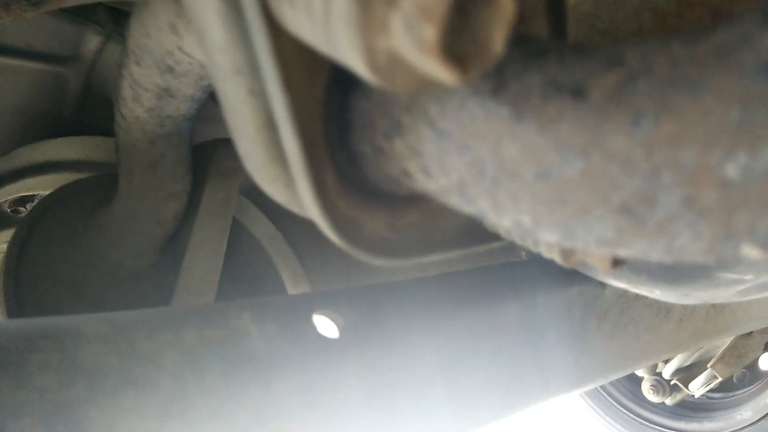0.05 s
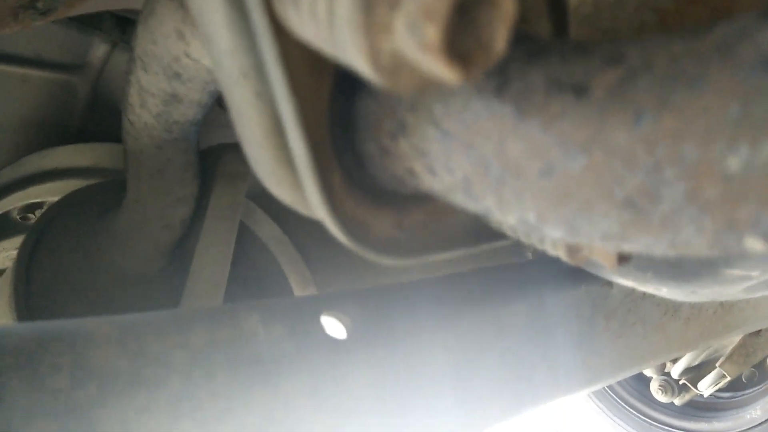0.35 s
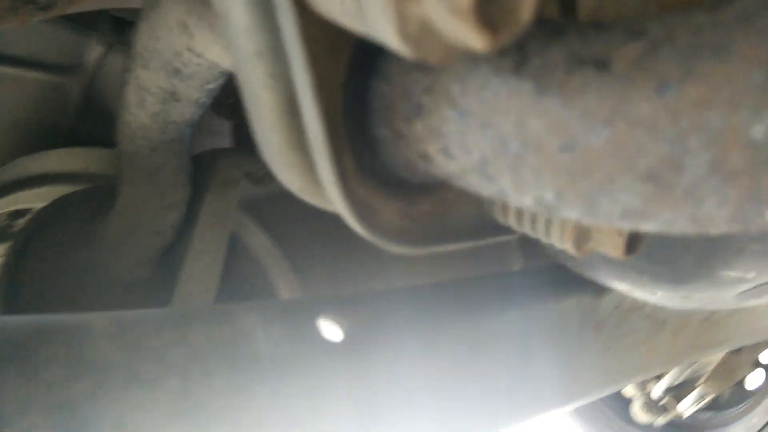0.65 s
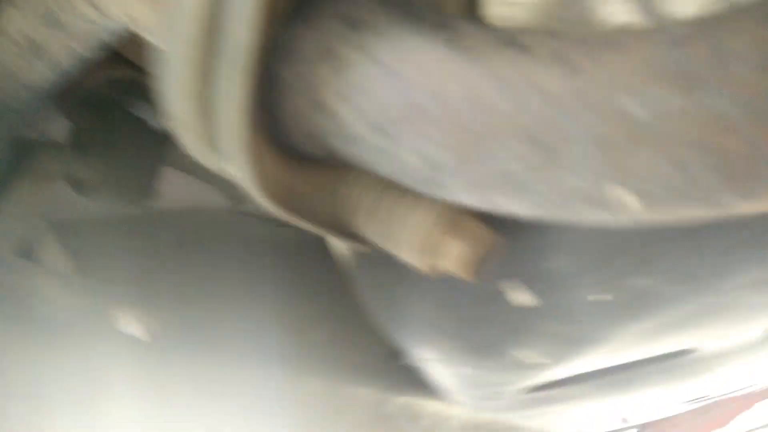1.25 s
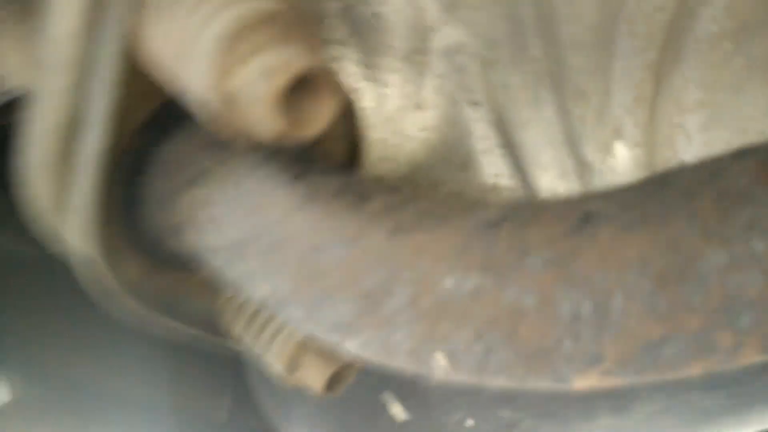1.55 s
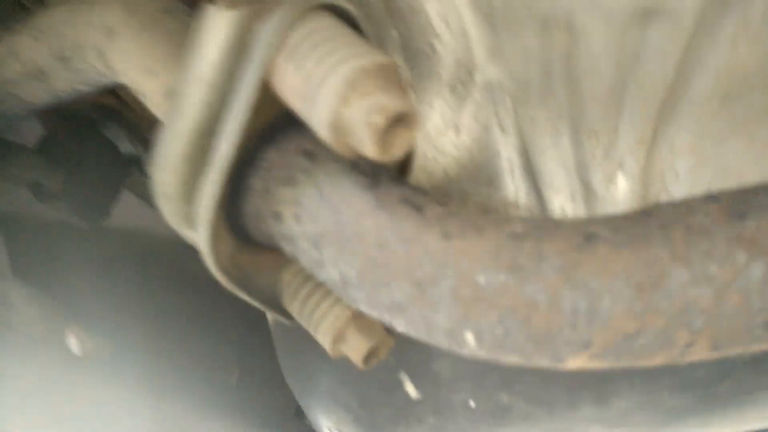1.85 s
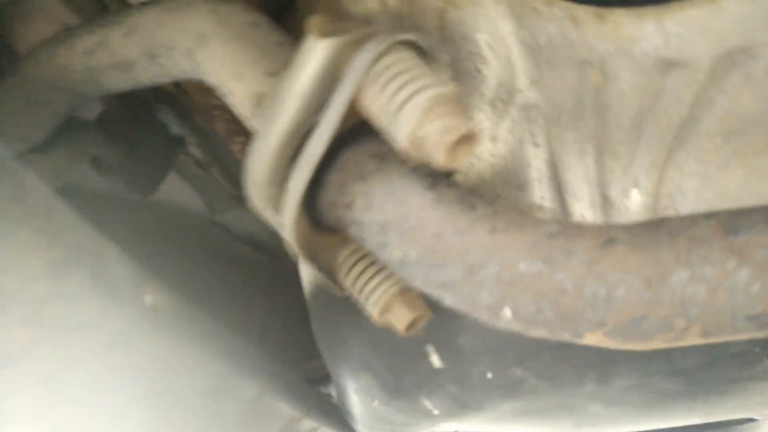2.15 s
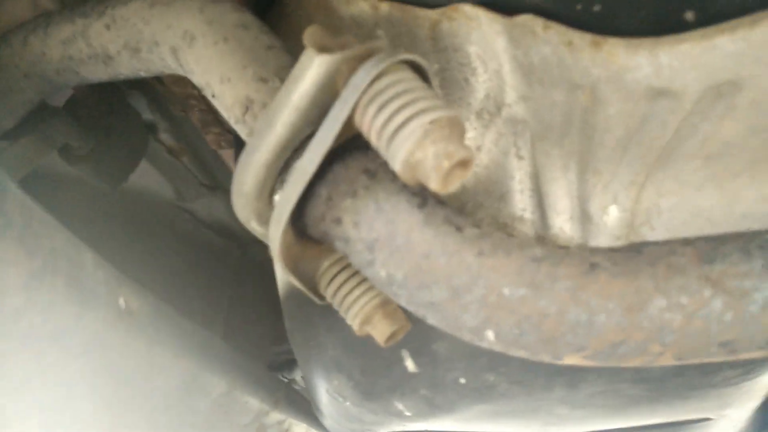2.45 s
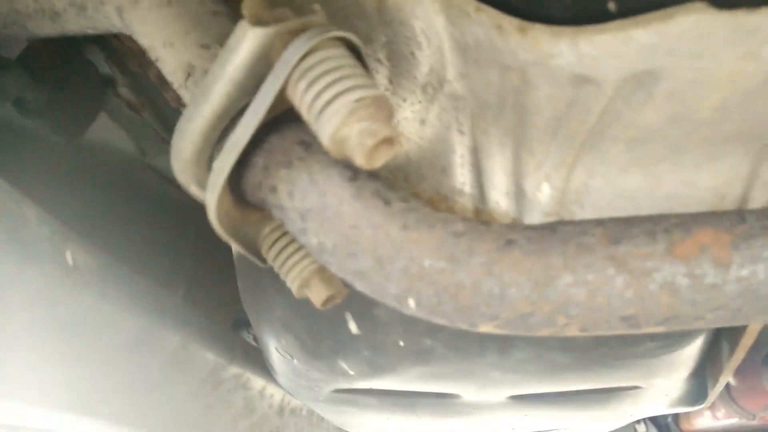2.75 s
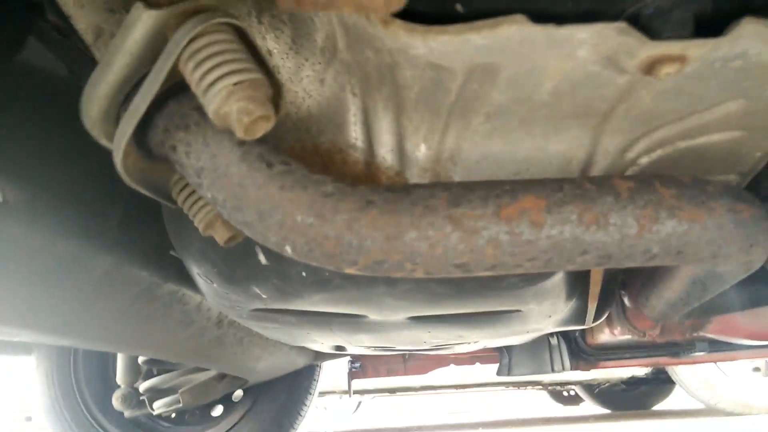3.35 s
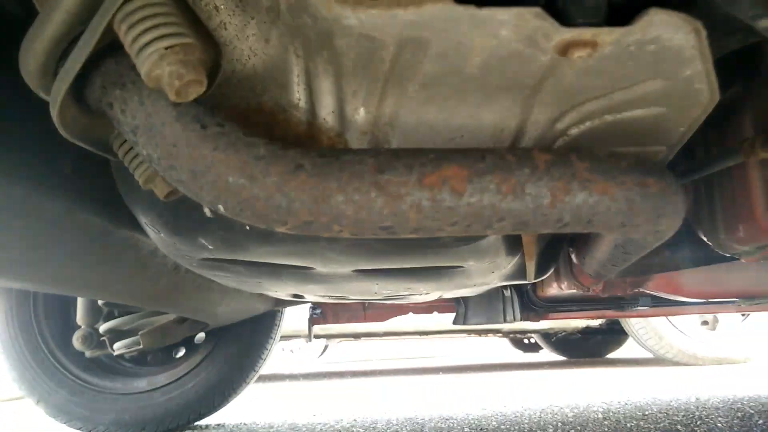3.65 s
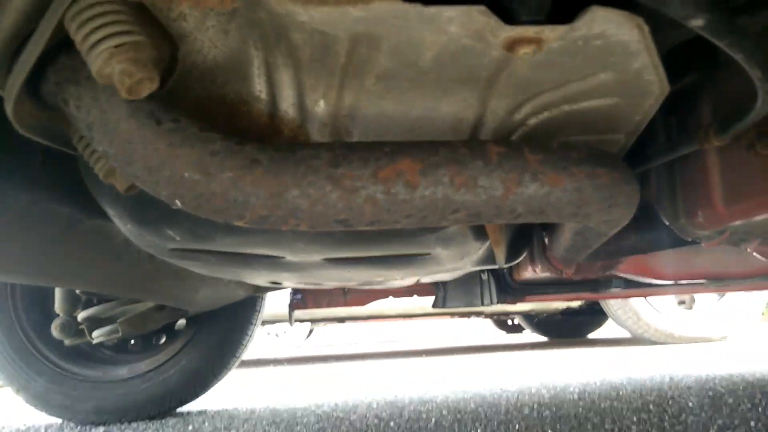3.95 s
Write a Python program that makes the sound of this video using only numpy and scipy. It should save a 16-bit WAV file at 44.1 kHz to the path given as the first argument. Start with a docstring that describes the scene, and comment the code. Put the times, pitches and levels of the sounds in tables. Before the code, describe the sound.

Fast, shrill metallic chirping with a gritty sizzle comes from an exhaust pipe joint, close up beneath an idling car. The engine hums softly below it. The chirping dips briefly halfway, and a small microphone bump comes near the end.

```python
"""Rhythmic squealing and rasping over a low hum: a dry, spring-loaded exhaust joint under an idling car.
The engine rocks the pipe 20 times a second. Each forward stroke starts with a falling squeal and breaks
into a rasp, each return stroke squeaks, and the joint sizzles in between. The pipe rings and the floor
pan reflects; the hand-held microphone is bumped twice."""
import sys
import numpy as np
from scipy import signal
from scipy.fft import rfft, irfft
from scipy.io import wavfile

SR = 44100
rng = np.random.default_rng(int(sys.argv[2]) if len(sys.argv) > 2 else 0)


def waveform_to_disk(signal):
    """Save audio, clipped to [-1, 1], as 16-bit WAV at the path in sys.argv[1]."""
    frames = np.transpose(np.atleast_2d(signal))
    scaled = np.clip(frames, -1, 1) * 32767
    samples = np.round(scaled).astype(np.int16)
    wavfile.write(sys.argv[1], SR, samples)


N = 4 * SR
TIME_S = np.arange(N) / SR
BINS_HZ = np.arange(N // 2 + 1) * SR / N
ROCK_HZ = 20


def amp(db):
    return 10 ** (np.asarray(db) / 20)


def unit_rms(x):
    return x / np.sqrt(np.mean(x ** 2) + 1e-20)


def at_time(rows, t_s=TIME_S):
    return np.interp(t_s, *np.transpose(rows))


def at_bins(rows):
    hz, values = np.transpose(rows)
    return np.interp(np.log(np.maximum(BINS_HZ, 1)), np.log(hz), values)


def drift(rate_hz):
    """Smooth random wander, rms 1."""
    return unit_rms(irfft(rfft(rng.standard_normal(N)) / (1 + (BINS_HZ / rate_hz) ** 2), N))


def colour(x, spectrum, skirt_db_oct=24):
    """Minimum-phase filter, sloping off outside the given spectrum; output rms 1."""
    hz = np.maximum(BINS_HZ, 1)
    outside_oct = np.abs(np.log2(hz / np.clip(hz, spectrum[0][0], spectrum[-1][0])))
    gain = amp(at_bins(spectrum) - skirt_db_oct * np.minimum(outside_oct, 3))
    cepstrum = irfft(np.log(gain), N)
    return unit_rms(irfft(rfft(x) * np.exp(rfft(2 * cepstrum[:N // 2], N)), N))


def ring(x, hz, t60_s):
    """One damped mode; output rms 1."""
    r, w = amp(-60 / (t60_s * SR)), 2 * np.pi * hz / SR
    return unit_rms(signal.lfilter([0, np.sin(w)], [1, -2 * r * np.cos(w), r * r], x + 1e-18))


def engine_hum():
    """Wavering multiples of the rocking rate; the fifth swells as the microphone moves."""
    orders = [(1, -33), (2, -11), (3, 0), (4, -4), (5, -9), (6, -18), (7, -15), (8, -20), (9, -16),
              (10, -12), (11, -13), (12, -16), (13, -18), (14, -19)]  # multiple, level/dB
    swell = [(0, -3), (1.8, -2), (2.0, 7), (2.25, 7), (2.4, -2), (4, -2)]  # t/s, level/dB
    hum = np.zeros(N)
    for k, db in orders:
        gain = amp(db + (k == 5) * at_time(swell) + 1.2 * drift(3.5))
        phase = 2 * np.pi * (k * ROCK_HZ * TIME_S + rng.random())
        hum += gain * np.sin(phase + .093 * k * drift(2.3))
    return amp(-40.5) * unit_rms(hum)


def engine_noise():
    """Mechanical noise and the whirring resonances it drives."""
    spectrum = [(15, -32), (25, -38), (43, -8.5), (65, -12), (92, -12.5), (124, -22), (156, -28.5),
                (197, -7.5), (473, -18.5), (541, -10.5), (607, -15), (749, -14), (978, -19.5),
                (1120, -14.5), (1250, -26), (1410, -14), (2400, -23), (3120, -2), (5280, -120)]  # f/Hz, density/dB
    likeness = [(60, .92), (130, 0), (250, 0.8), (500, 0.45), (1000, 0.13), (3000, 0.56)]  # f/Hz, L-R correlation
    resonances = [(191, 14, -51), (528, 22, -59), (770, 12, -63), (1147, 55, -57)]  # f/Hz, width/Hz, level/dB
    # t/s, level/dB
    noise_level = [(0, 1.5), (1.2, 1), (1.7, 1), (2.15, -0.5), (2.6, 1.5), (3.2, 0), (4, 0)]
    whirr_level = [(0, -1), (.6, 1.5), (1.1, -1), (1.6, 0), (2.1, -7), (3, -5), (4, -6)]
    alike = at_bins(likeness)
    mid, side = rfft(rng.standard_normal((2, N)))
    noise = irfft(np.sqrt(1 + alike) * mid + np.sqrt(1 - alike) * side * [[1], [-1]], N)
    whirr = sum(amp(db) * ring(noise, hz, np.log(1000) / np.pi / width_hz)
                for hz, width_hz, db in resonances)
    rumble = colour(noise, spectrum, skirt_db_oct=14)
    return amp(at_time(noise_level) - 41.5) * rumble + amp(at_time(whirr_level)) * whirr


def microphone_bumps(click_decay_s=.0012, click_lag_s=.0061):
    """Light knocks on the case: a thud, then a click."""
    knocks = [(1.068, 128, 0.27, -38, -67), (3.793, 360, 0.022, -22.5, -13)]  # t/s, thud f/Hz, t60/s, thud level/dB, click level/dB
    click_spectrum = [(400, -16), (1200, -4), (7000, 17), (10000, -10)]  # f/Hz, density/dB
    out = np.zeros((2, N))
    for start_s, hz, t60_s, thud_db, click_db in knocks:
        age_s = np.maximum(TIME_S - start_s, 0)
        noise = colour(rng.standard_normal(N), [(hz * .5, 0), (hz * 1.7, 0)], skirt_db_oct=13)
        thud = .8 * np.sin(2 * np.pi * hz * age_s) + .7 * noise
        out += amp(thud_db - 60 * age_s / t60_s) * (age_s > 0) * thud
        click_age_s = age_s - click_lag_s
        click = colour(rng.standard_normal((2, N)), click_spectrum)
        out += amp(click_db) * np.exp(-np.abs(click_age_s) / click_decay_s) * (click_age_s > 0) * click
    return out


def underbody(x, t60_s=.03, left_lead_s=.00038, sway_hz=3):
    """Direct sound, left first, plus equally strong floor-pan echoes that shift as the hand sways."""
    lag_s = np.arange(SR // 14) / SR
    echoes = rng.standard_normal((6, 2, len(lag_s))) * amp(-60 * lag_s / t60_s) * (lag_s > .0004)
    echoes /= np.sqrt(np.sum(echoes ** 2, axis=2, keepdims=True))
    shares = np.array([drift(sway_hz) for _ in echoes])
    shares /= np.sqrt(np.sum(shares ** 2, axis=0))
    reflected = sum(share * signal.oaconvolve(x[None], echo, axes=1)[:, :N]
                    for share, echo in zip(shares, echoes))
    direct = np.array([x, np.roll(x, int(left_lead_s * SR))])
    return (direct + reflected) / np.sqrt(2)


def pipe(drive, gain_db=5, left_bias_db=2.5):
    """Friction keeps pipe and flange ringing; each mode reaches the right side with its own delay."""
    modes = [(2708, -59), (2799, -50), (3079, -49), (3348, -47), (3510, -50), (3731, -51), (4511, -49),
             (4850, -54), (5868, -47), (6627, -44), (7187, -50), (7655, -52), (8113, -53)]  # f/Hz, level/dB
    out = np.zeros((2, N))
    for hz, db in modes:
        mode = amp(db + gain_db) * ring(drive, hz, t60_s=.12)
        out += [mode, np.roll(mode, rng.integers(12, 22))]
    return out * amp(np.array([[.5], [-.5]]) * left_bias_db)


def strokes(slips_s, shape_ms, level, scatter_db):
    """One pulse per slip; shape_ms is (delay, attack, hold, release to 1/e)."""
    delay_ms, attack_ms, hold_ms, release_ms = shape_ms
    out = np.zeros(N)
    for start_s in slips_s + delay_ms / 1000:
        span = slice(max(int(start_s * SR), 0), max(int((start_s + 2 / ROCK_HZ) * SR), 0))
        age_ms = (TIME_S[span] - start_s) * 1000
        gain = amp(at_time(level, start_s) + scatter_db * rng.standard_normal())
        release = np.exp(-np.maximum(age_ms - attack_ms - hold_ms, 0) / release_ms)
        out[span] += gain * np.clip(age_ms / attack_ms, 0, 1) * release
    return out


def friction(envelope, spectrum, grain_db, slips_per_s=14000):
    """Dense tiny slips of uneven size, coloured by the metal; rms follows the envelope."""
    ticks = (rng.random(N) < slips_per_s / SR) * rng.choice([-1, 1], N)
    grains = ticks * amp(grain_db * drift(450))
    return colour(grains * envelope, spectrum) * np.sqrt(np.mean(envelope ** 2))


def stick_slip(slips_s, shape_ms, level, partials, pitch_hz, sag_per_ms, jitter=.016, scatter_db=.8):
    """Regular stick-slip: a jittery harmonic tone that falls during each stroke."""
    starts_s = slips_s + shape_ms[0] / 1000
    stroke = np.maximum(np.searchsorted(starts_s, TIME_S) - 1, 0)
    age_ms = (TIME_S - starts_s[stroke]) * 1000
    detune = .012 * rng.standard_normal(len(slips_s))[stroke]
    hz = pitch_hz * np.exp(-sag_per_ms * age_ms + detune + jitter * drift(877))
    phase = 2 * np.pi * np.cumsum(hz) / SR
    tone = sum(amp(db + 1.5 * drift(250)) * np.sin(k * phase) for k, db in partials)
    return unit_rms(tone) * strokes(slips_s, shape_ms, level, scatter_db)


def slip_times(jitter_ms=.3):
    """When the joint breaks loose in each cycle, in s; a wider swing slips earlier."""
    slip_delay = [(0, 24.6), (.4, 23.6), (.9, 22.2), (1.6, 21), (1.95, 22.3), (2.15, 26.5), (2.5, 24.6),
                  (2.95, 23.6), (3.1, 26), (3.55, 24.6), (4, 27.5)]  # t/s, delay/ms
    cycles_s = np.arange(-1, N / SR * ROCK_HZ) / ROCK_HZ
    delay_ms = at_time(slip_delay, cycles_s) + jitter_ms * rng.standard_normal(len(cycles_s))
    return cycles_s + delay_ms / 1000


def sizzle():
    """Continuous fine friction in the joint."""
    level = [(0, -0.5), (.5, 1), (1.0, -.5), (1.8, 0), (2.15, -8), (2.45, -1), (2.8, 0), (3.1, -2.5),
             (3.9, -3), (4, -8)]  # t/s, level/dB
    spectrum = [(2400, -17.5), (2650, -16), (2900, -8), (3350, -1.5), (3800, -4.5), (4200, -12),
                (5000, -12), (5600, -11.2), (5900, -2), (6650, -0.9), (7200, -9), (8000, -17), (9400, -14),
                (10700, -26), (12300, -18.5), (15500, -23.5)]  # f/Hz, density/dB
    return amp(-28) * friction(amp(at_time(level)), spectrum, grain_db=2)


def return_stroke(slips_s):
    """The joint slides back with a squeak and a scrape."""
    level = [(0.01, -6.7), (0.11, -0.9), (0.41, -2.7), (1.06, 2.9), (1.16, -1.6), (1.21, 1.7), (1.86, -2.5),
             (2.06, -9.8), (2.26, -10.7), (2.31, -4.9), (2.86, -3.9), (3.06, -6.5), (3.61, -3.1),
             (3.66, -6.9), (3.91, -3.3), (3.96, -8.3)]  # t/s, level/dB
    partials = [(1, -16), (2, 0), (3, -15), (4, -21)]  # multiple, level/dB
    spectrum = [(2600, -26.5), (3100, -21), (3600, -1), (4200, -17), (5500, -10), (6000, -5), (6700, -1.3),
                (7700, -19.5), (9300, -6.5), (10700, -18.5), (12300, -19), (15500, -23)]  # f/Hz, density/dB
    squeak = stick_slip(slips_s, (31.3, 1.8, 3, 3.2), level, partials,
                        pitch_hz=3260, sag_per_ms=.005, scatter_db=1.2)
    scrape = friction(strokes(slips_s, (31, 2, 5, 6.5), level, scatter_db=.7), spectrum, grain_db=2)
    return amp(-23.5) * squeak + amp(-23) * scrape


def forward_stroke(slips_s):
    """A gritty squeal drops to a lower chirp at full speed and breaks into a rasp; the flange thrums."""
    squeal_pitch = [(0, 4950), (.45, 4800), (.62, 5150), (.8, 4900), (1.1, 4930), (1.55, 4720), (1.7, 4660),
                    (2, 4700), (2.6, 4900), (3.3, 4850), (3.8, 5100)]  # t/s, starting f/Hz
    # t/s, level/dB
    squeal_level = [(0.03, -0.8), (0.08, -11.7), (0.12, -0.3), (0.18, -8.9), (0.38, 2.3), (0.43, -7.6),
                    (0.48, 1.2), (1.38, -2.3), (1.48, 4.6), (1.98, -3.6), (2.02, -18.8), (2.27, -28.2),
                    (2.33, -18.7), (2.38, -26.3), (2.43, -6.6), (2.98, -3.3), (3.18, -26.1), (3.23, -12.4),
                    (3.58, -8.5), (3.68, -27.5), (3.83, -14.6), (3.98, -28.2)]
    chirp_level = [(0, -3), (.3, -1), (.6, 1), (.75, -6), (1.2, -7), (1.5, -2), (1.8, -4), (2.1, -16),
                   (2.45, -5), (2.9, -7), (3.3, -11), (3.6, -7), (4, -9)]
    rasp_level = [(0.04, 1.2), (0.74, 1), (0.79, 4), (0.94, 0.3), (1.08, 3.2), (1.58, -1), (1.74, 2),
                  (1.99, -3.5), (2.19, -16), (2.34, 0.5), (2.39, -6), (2.44, 0.8), (2.94, -0.5), (3.29, -5),
                  (3.59, -2), (3.69, -5), (3.94, -3.5), (3.99, -23)]
    thrum_level = [(0, -9), (.5, 6.5), (1.0, 0.5), (1.5, -3), (2.15, -3), (2.5, 0.5), (2.95, 1), (3.1, -27),
                   (4, -9)]
    # multiple, level/dB
    squeal_partials = [(1, 0), (2, -4), (3, -10.5)]
    chirp_partials = [(1, 0), (2, -3), (3, -10), (4, -16)]
    # f/Hz, density/dB
    grit_spectrum = [(3000, -16), (7000, -2), (9000, 1), (10700, -10.5), (12000, -2.5), (15500, -2)]
    rasp_spectrum = [(2000, -16.5), (2450, -27), (2630, -19.5), (2850, -5), (3400, -8.5), (3850, -1.5),
                     (4200, -8.5), (4600, -4.5), (5100, -6.5), (5600, -10), (5900, 2), (6600, -2.1),
                     (7200, 0), (7900, -9), (9000, -5.5), (9800, -4.5), (10700, -28), (12000, -8.5),
                     (15000, -26.5), (16000, -7)]
    thrum_spectrum = [(1300, -7), (1600, -3.5), (2050, 3), (2450, 6), (2600, -6.5)]
    squeal = stick_slip(slips_s, (0, .8, 3.6, 2), squeal_level, squeal_partials,
                        pitch_hz=at_time(squeal_pitch), sag_per_ms=.009)
    chirp = stick_slip(slips_s, (6, 1.5, 3.5, 2.2), chirp_level, chirp_partials,
                       pitch_hz=3750, sag_per_ms=.022, jitter=.018)
    grit_envelope = strokes(slips_s, (1, 3.5, 6, 4), squeal_level, scatter_db=.6)
    rasp_envelope = strokes(slips_s, (3, 3.6, 5.5, 6.5), rasp_level, scatter_db=.4)
    thrum_envelope = strokes(slips_s, (6.2, 8.7, 11.7, 24), thrum_level, scatter_db=.5)
    grit = friction(grit_envelope, grit_spectrum, grain_db=1.6)
    rasp = friction(rasp_envelope, rasp_spectrum, grain_db=1.8)
    thrum = friction(thrum_envelope, thrum_spectrum, grain_db=1.6)
    return amp(-22.3) * squeal + amp(-23) * chirp + amp(-27) * grit + amp(-17) * rasp + amp(-46) * thrum


def scene():
    """Joint, echoes and engine, mostly left of centre, plus pipe ring and bumps."""
    balance = [(60, 1.0), (80, 1.5), (110, 2.0), (140, 1.5), (190, 4.0), (260, 2.5), (340, 1.5), (460, 3.0),
               (610, 1.5), (820, 1.5), (1100, 4.0), (1470, 5.0), (1960, 2.5), (2620, 1.5), (3510, -1.5),
               (4690, 4.5), (6270, 5.5), (8390, 0.0), (11200, 0.0), (15000, -0.5)]  # f/Hz, L-R level/dB
    slips_s = slip_times()
    joint = forward_stroke(slips_s) + return_stroke(slips_s) + sizzle()
    # narrow gap just below the pipe's first modes
    rubbing = signal.lfilter(*signal.iirnotch(2614, Q=13, fs=SR), joint)
    under_car = underbody(rubbing) + engine_hum() + engine_noise()
    sides = amp(np.array([[.5], [-.5]]) * at_bins(balance))
    sides /= np.sqrt(np.mean(sides ** 2, axis=0))
    return irfft(rfft(under_car) * sides, N) + pipe(rubbing) + microphone_bumps()


def record(dry):
    """Steep low-pass at 15950 Hz."""
    return signal.sosfilt(signal.ellip(12, .1, 90, 15950, fs=SR, output="sos"), dry)


dry = scene()
out = record(dry)
waveform_to_disk(out)
```